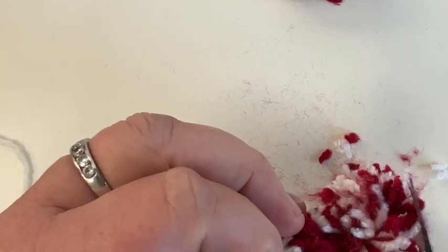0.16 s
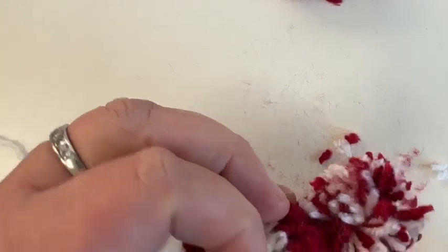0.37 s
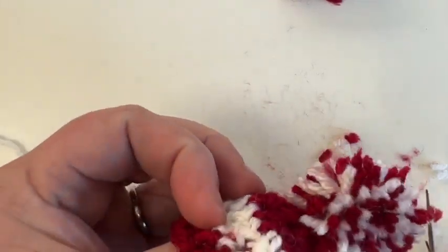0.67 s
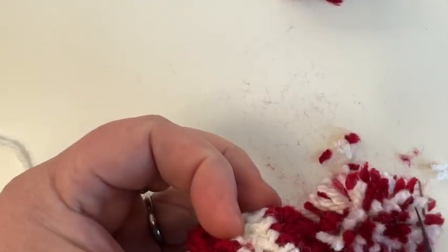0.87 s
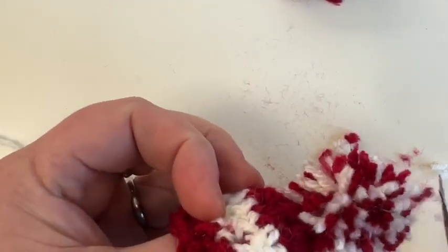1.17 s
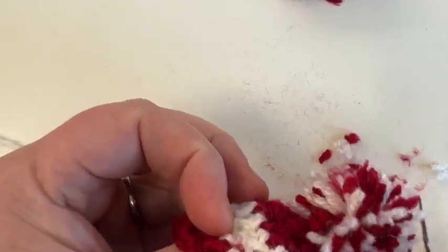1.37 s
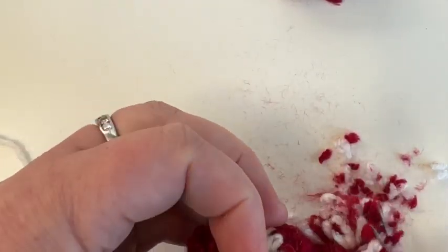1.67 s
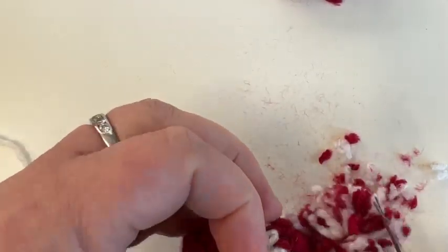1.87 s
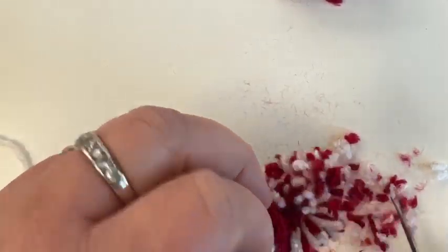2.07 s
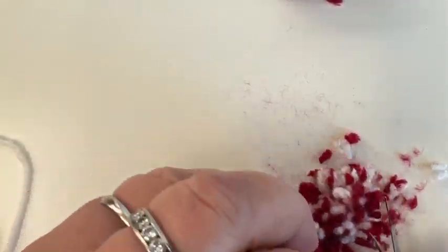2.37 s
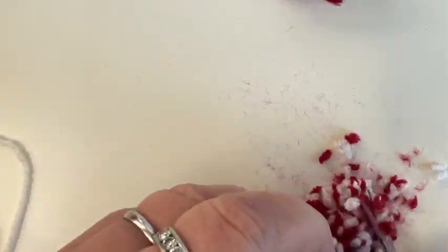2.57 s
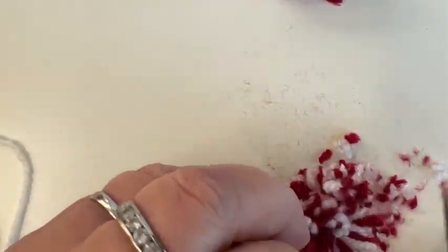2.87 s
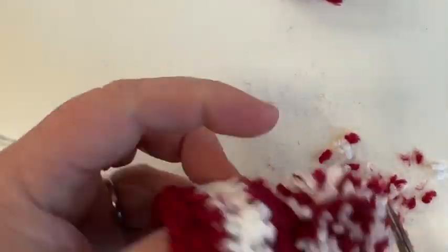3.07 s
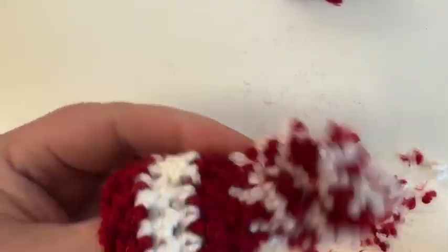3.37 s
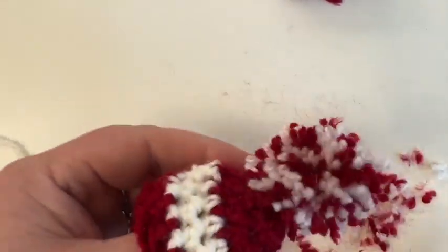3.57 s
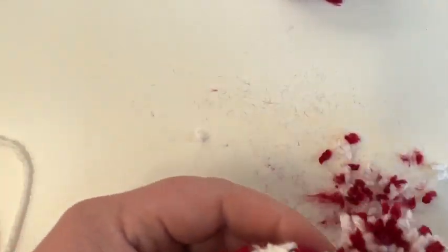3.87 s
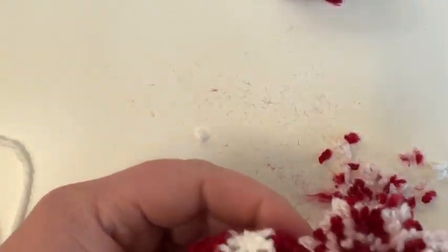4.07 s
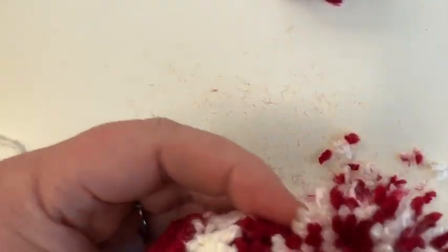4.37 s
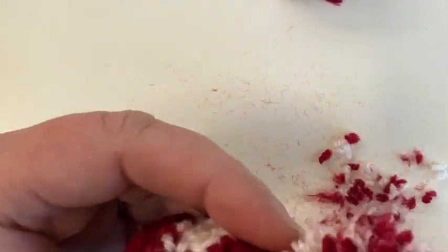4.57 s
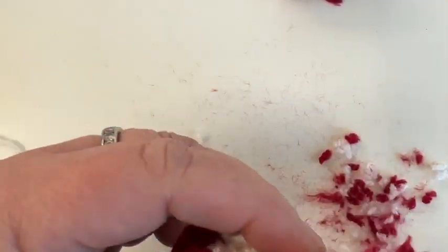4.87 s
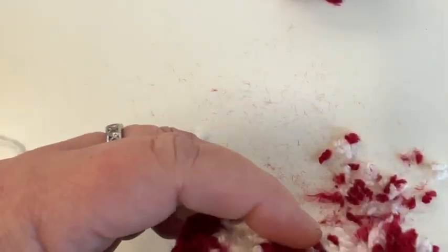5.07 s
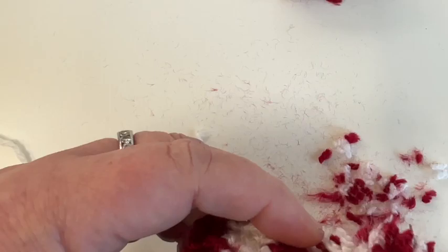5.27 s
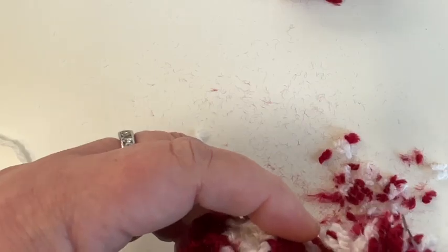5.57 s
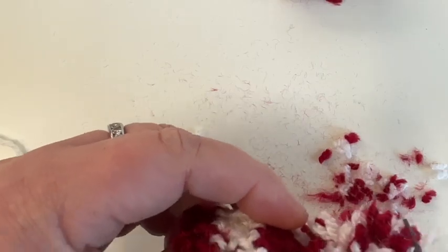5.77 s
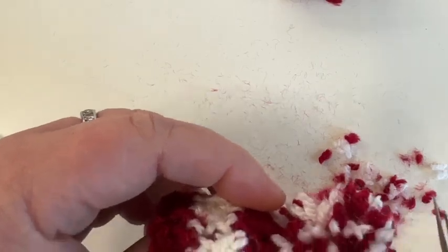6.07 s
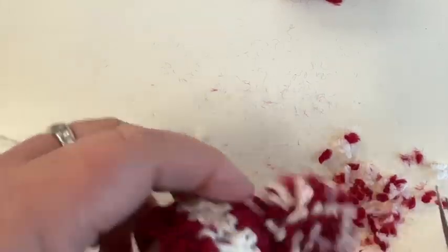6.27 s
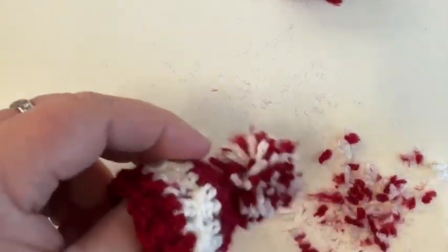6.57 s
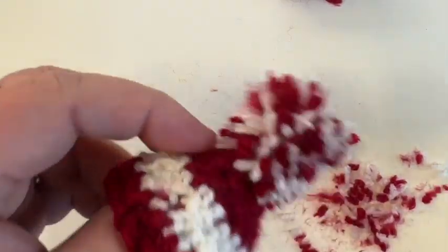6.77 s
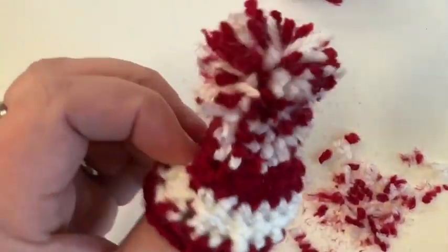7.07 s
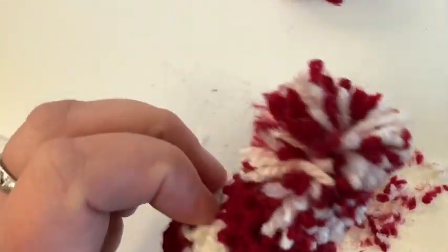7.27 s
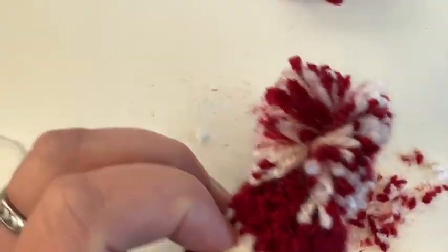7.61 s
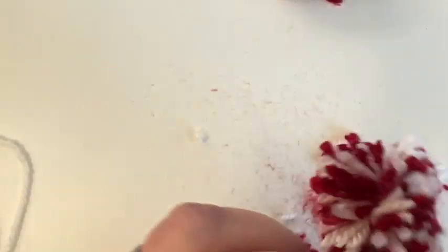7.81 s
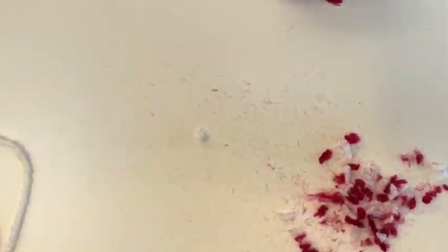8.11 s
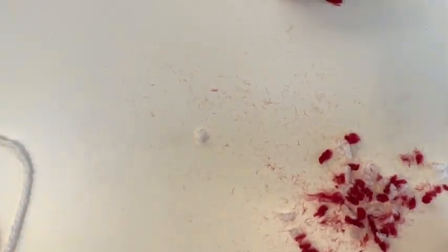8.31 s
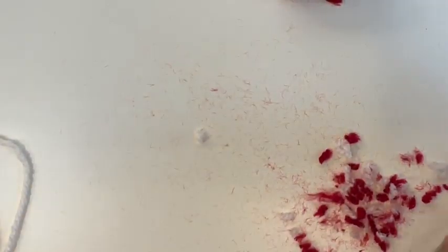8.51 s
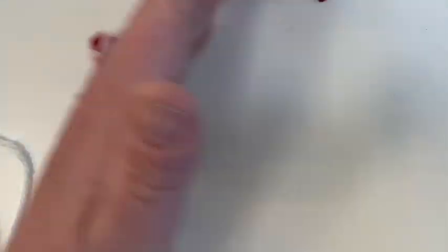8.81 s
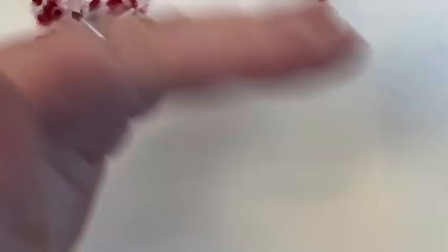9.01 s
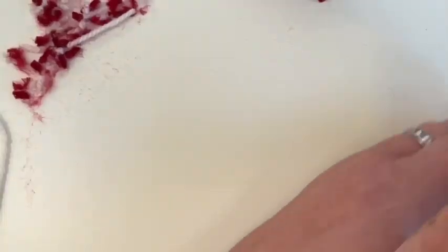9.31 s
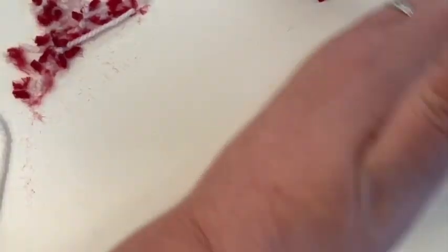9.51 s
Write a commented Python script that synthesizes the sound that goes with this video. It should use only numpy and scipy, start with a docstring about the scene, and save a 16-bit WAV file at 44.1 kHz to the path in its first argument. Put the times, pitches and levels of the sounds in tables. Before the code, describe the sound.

A quiet small room with low rumble and faint hum, heard close at a tabletop. From 0 to 2.6 s scissors make four short rasping cuts through yarn, at about 0.1, 0.9, 1.7 and 2.5 s, swelling into crunches, with a bright click at 0.25 and faint blade slides between. At 2.8 s they knock down on the table with a brief scrape. Soft wool rustle follows, barely audible. At 5.5 s a longer cut swells and snaps shut at 5.75; a sharp steel click comes at 6.6 amid rising rustle until 7. At 7.15 the scissors hit the table hard, then clatter in a rapid burst at 7.45 and small dying bounces to 7.8. A palm lands softly at 8.15, slides, and pushes a grainy hiss from 8.5 to 8.9. A second dull landing at 9.2 leads to a shorter sweep ending near 9.7.

```python
"""Scissors rasp through a yarn pompom and click shut; twice they clatter down on the tabletop.
The wool rustles as it is turned, then a palm lands and sweeps the clippings away in two strokes.
Rasp, rustle and sweep are grainy friction noise, shaped by the blades, the wool or the table.
Clicks are short noise bursts; blows ring the modes of the tabletop. A quiet room hums and echoes."""
import sys
import numpy as np
from scipy import signal
from scipy.fft import rfft, irfft, next_fast_len
from scipy.io import wavfile
from scipy.ndimage import map_coordinates

SR = 44100
rng = np.random.default_rng(int(sys.argv[2]) if len(sys.argv) > 2 else 0)


def wav_out(sig):
    """Save sig, one row per channel (or a flat mono array), as 16-bit PCM at SR to the path in sys.argv[1]."""
    wavfile.write(sys.argv[1], SR, np.round(np.clip(np.atleast_2d(sig).T, -1, 1) * 32767).astype(np.int16))


N = 425562

# colour of rubbed wool, also of the blades' scrape: (frequency [Hz], gain [dB])
WOOL_COLOUR = [(300, 8), (900, 1.5), (1900, -7.5), (2800, 0), (4000, -5), (6000, -6), (9000, -7.5),
               (12000, -7), (16000, -25)]
# left-right correlation of nearby noise: (frequency [Hz], likeness [-1..1])
NEAR_SAME = [(300, 1), (600, .75), (1100, .65), (1800, .99), (4000, .97), (5000, .72), (6000, .99),
             (7300, .98), (9500, .76), (11500, .76), (12400, .98), (12900, .999)]
# left-right correlation of the tabletop and the room tail: (frequency [Hz], likeness [-1..1])
PLATE_SAME = [(60, 1), (150, .99), (350, .9), (600, .6), (1100, .55), (1700, .99), (4000, .88), (6500, .96),
              (9500, .75), (12500, .95)]
BLADE_ATTACK_S, BLADE_RELEASE_S = 0.0076, 0.0048


def amp(db):
    """Decibels to gain."""
    return 10 ** (np.asarray(db) / 20)


def unit(x):
    """Scales to rms 1."""
    return x / np.sqrt(np.mean(x ** 2) + 1e-20)


def read(points, hz):
    """Reads a table of (Hz, value) on a log-frequency axis."""
    f, value = np.transpose(points)
    return np.interp(np.log(hz + 1), np.log(f + 1), value)


def seconds(size):
    """Time axis of size samples."""
    return np.arange(size) / SR


def noise_pair(size):
    """Two unrelated channels of white noise."""
    return rng.standard_normal((2, size))


def add(mix, start_s, sound):
    """Mixes a two-channel sound in at start_s."""
    part = mix[:, max(round(start_s * SR), 0):][:, :sound.shape[-1]]
    part += sound[..., :part.shape[1]]


def gate(t, length_s, attack_s, release_s):
    """Exponential attack, hold and release over the time t since the start."""
    rise = 1 - np.exp(-np.maximum(t, 0) / attack_s)
    return rise * np.exp(-np.maximum(t - length_s, 0) / release_s)


def shape(x, gain):
    """Causal minimum-phase filter whose magnitude is gain(hz)."""
    size = 2 * next_fast_len(x.shape[-1] // 2 + 2048)
    log_gain = np.log(np.maximum(gain(abs(np.fft.fftfreq(size, 1 / SR))), 1e-5))
    response = np.exp(signal.hilbert(log_gain).conj())[:size // 2 + 1]
    return irfft(rfft(x, size) * response, size)[..., :x.shape[-1]]


def resonate(x, centre_hz, width_hz):
    """A resonance of gain 1 whose centre follows the curve centre_hz."""
    turn = np.exp(2j * np.pi * np.cumsum(centre_hz) / SR)
    r = np.exp(-np.pi * width_hz / SR)
    return 2 * (turn * signal.lfilter([1 - r], [1, -r], x / turn)).real


def pair(x, likeness):
    """Blends two unrelated signals into left and right of the given likeness."""
    size = next_fast_len(x.shape[-1])
    same = np.clip(read(likeness, np.fft.rfftfreq(size, 1 / SR)), -1, 1)
    mid, side = rfft(x, size) * np.sqrt([(1 + same) / 2, (1 - same) / 2])
    return irfft(np.array([mid + side, mid - side]), size)[:, :x.shape[-1]]


def dying(decay, size):
    """Two channels of noise in which each band dies at its own speed."""
    hz, t, z = signal.stft(noise_pair(size), SR, nperseg=128)
    z = z * amp(-60 * t / read(decay, hz)[:, None])
    return pair(signal.istft(z, SR)[1][:, :size], PLATE_SAME)


def friction(size, slips_per_s, spread_db, smooth, patchy_db, patch_hz):
    """Surfaces catch and slip: tiny clicks of uneven size over a smooth hiss, coming in clumps."""
    slip_sizes = amp(spread_db * np.minimum(rng.exponential(1, size), 4))
    slips = (rng.random(size) < slips_per_s / SR) * slip_sizes
    grains = unit(slips * noise_pair(size)) + smooth * noise_pair(size)
    clumps = np.interp(np.arange(size) * patch_hz / SR, np.arange(size), rng.standard_normal(size))
    return pair(grains, NEAR_SAME) * amp(patchy_db * clumps)


def mottle(x, depth_db, width_hz, span_s):
    """The colour shifts as the contact moves: random peaks and dips, width_hz wide and span_s long."""
    hz, t, z = signal.stft(x, SR, nperseg=256)
    grid = np.meshgrid(hz / width_hz, t / span_s, indexing="ij")
    field = map_coordinates(rng.standard_normal((96, 96)), grid, order=1, mode="wrap")
    return signal.istft(z * amp(depth_db * field), SR)[1][:, :x.shape[-1]]


def mirrored(hz, spacing_hz):
    """The tabletop mirrors a sound just above it: a comb with a tooth every spacing_hz."""
    reflection = .5 / (1 + (hz / 12000) ** 2)
    return abs(1 + reflection * np.exp(-2j * np.pi * hz / spacing_hz))


def room_tone(hum_width_hz=4):
    """Low rumble of the room with a wavering hum, made of very narrow noise bands."""
    # rumble spectrum: (frequency [Hz], gain [dB])
    air_colour = [(25, -28.5), (48, -8), (75, -9.5), (150, -15), (205, -10.5), (300, -21), (370, -20),
                  (550, -27.5), (800, -30), (1100, -39.5), (2500, -46.5), (4500, -52.5), (7000, -51.5),
                  (11000, -57.5), (16000, -59)]
    # left-right correlation of the rumble: (frequency [Hz], likeness [-1..1])
    air_same = [(100, 1), (300, 0.82), (550, 0), (1100, 0), (2000, 0.97), (4000, 0.95), (6500, 1),
                (10000, 0.75)]
    # hum bands: (frequency [Hz], rms level [dB])
    hum_bands = [(49, -63.5), (198, -73)]
    out = amp(-62) * unit(shape(pair(noise_pair(N), air_same), lambda hz: amp(read(air_colour, hz))))
    for f, db in hum_bands:
        band = shape(rng.standard_normal(N), lambda hz: 1 / (1 + ((hz - f) / hum_width_hz) ** 2))
        out = out + amp(db) * unit(band)
    return out


def slide(t, glide, scrape_db):
    """Undamped by yarn, the blades ring in narrow bands that glide, over a scrape."""
    # bands of the free blades: (frequency [Hz], width per pass [Hz], level [dB])
    slide_ring = [(1340, 150, 6), (2850, 640, -0.5), (4090, 980, -2), (7400, 740, -20)]
    drive = friction(len(t), slips_per_s=2600, spread_db=3, smooth=.8, patchy_db=1.2, patch_hz=70)
    bend = 2 ** (glide * np.minimum(t, .1))
    ring = 0
    for f, width_hz, db in slide_ring:
        ring = ring + amp(db) * resonate(resonate(drive, f * bend, width_hz), f * bend, width_hz)
    scrape = shape(drive, lambda hz: amp(read(WOOL_COLOUR, hz)))
    return unit(unit(ring) + amp(scrape_db) * unit(scrape))


def slides(fade_db=0.5):
    """Empty blades slide on each other with a hollow ring, fading by fade_db over each length."""
    # (start [s], length [s], level [dB], glide [octaves/s], scrape against the ring [dB])
    slide_rows = [(0.0, 0.079, -69, -0.15, 0), (0.347, 0.062, -71, -2, -8), (1.13, 0.038, -66.5, -1.4, -9),
                  (2.009, 0.055, -66.5, -1, -3)]
    out, t = np.zeros((2, N)), seconds(SR // 3)
    for start_s, length_s, db, glide, scrape_db in slide_rows:
        force = amp(db - fade_db * t / length_s) * gate(t, length_s, BLADE_ATTACK_S, BLADE_RELEASE_S)
        add(out, start_s, slide(t, glide, scrape_db) * force)
    return out


def steel(hz, own_peak, valley_db=-19):
    """Gain of the blades' broad resonances, plus one own_peak of the moment."""
    # blade resonances: (frequency [Hz], width [Hz], level [dB])
    blade_peaks = [(1250, 330, -4), (2620, 850, 2), (4340, 2000, -2), (6220, 1100, 1), (8260, 2300, -1.5),
                   (11000, 4000, -4.5), (14700, 1500, -8)]
    power = amp(valley_db) ** 2
    for f, width_hz, db in [*blade_peaks, own_peak]:
        power = power + amp(db) ** 2 / (1 + (2 * (hz - f) / width_hz) ** 2) ** 2
    return np.sqrt(power) * hz ** 2 / (hz ** 2 + 900 ** 2)


def rasp(size, tilt_db, ring_hz, ring_db, ring_width_hz=900, comb_hz=1420):
    """Shearing strands rings the blades, whose colour shifts as the crossing point travels."""
    drive = friction(size, slips_per_s=5000, spread_db=2, smooth=.5, patchy_db=1.6, patch_hz=170)
    spacing_hz = comb_hz * rng.uniform(.975, 1.025)  # the height of the blades varies

    def gain(hz):
        tilt = amp(tilt_db * np.log2(np.maximum(hz, 1000) / 5000))
        return steel(hz, (ring_hz, ring_width_hz, ring_db)) * mirrored(hz, spacing_hz) * tilt

    return unit(mottle(shape(drive, gain), depth_db=3.8, width_hz=330, span_s=.03))


def snips(open_ring_hz=4280, swell_curve=1.49):
    """The rasp swells as blades close on strands; the low open ring passes to the grip resonance."""
    # cuts: (start [s], end [s], final level [dB], swell [dB], brightness [dB/octave],
    #        ring of the open blades [dB], grip resonance [Hz], its level [dB])
    snip_rows = [(0.078, 0.217, -56, 10.5, -1.5, 3, 9000, -6), (0.884, 1.01, -49, 20, 0, 6.5, 7900, 8),
                 (1.711, 1.876, -50.5, 23.5, 0.5, -1, 7650, 5), (2.516, 2.59, -55, 1.5, 1, 7, 7590, 1),
                 (5.498, 5.721, -50, 25, -.5, -4, 7180, 8)]
    # thick bundles give way with a crunch: (time [s], half length [s], extra level [dB])
    bundles = [(0.138, .017, 8), (0.209, 0.012, 5), (1.007, .008, 9.5), (1.838, .02, 4),
               (5.625, 0.0053, 3.5), (5.662, 0.0068, 5.5), (5.713, .012, 9.5)]
    out, t = np.zeros((2, N)), seconds(SR // 3)
    for start_s, end_s, db, swell_db, tilt_db, open_db, grip_hz, grip_db in snip_rows:
        length_s = end_s - start_s
        still_open = np.clip(1 - t / length_s, 0, 1)
        shut = 1 - still_open
        crunch_db = sum(extra_db * np.exp(-((start_s + t - s) / half_s) ** 2)
                        for s, half_s, extra_db in bundles)
        force = amp(db - swell_db * still_open ** swell_curve + crunch_db)
        open_rasp = rasp(len(t), tilt_db, open_ring_hz, open_db)
        shut_rasp = rasp(len(t), tilt_db, grip_hz, grip_db)
        cut = np.sqrt(1 - shut ** 2) * open_rasp + shut * shut_rasp
        add(out, start_s, cut * force * gate(t, length_s, BLADE_ATTACK_S, BLADE_RELEASE_S))
    return out


def clicks(ring_s=0.00084, rebound_s=0.0013, rebound_db=-2):
    """Blades meet their stop or tick at the pivot: held steel rings for a millisecond, rebounds once."""
    # (time [s], level [dB], 20 dB above the rms of the burst)
    click_rows = [(0.2533, -21.5), (0.349, -55), (1.041, -40), (1.131, -54), (1.93, -43.5), (5.7473, -19),
                  (5.902, -57), (6.234, -46), (6.2985, -47.5), (6.6002, -15.5), (7.462, -25),
                  (7.9076, -40.5), (7.947, -38.5)]
    # (frequency [Hz], gain [dB])
    click_colour = [(1000, -45), (2100, -19), (2900, -2.5), (4200, -20), (5600, -3), (7400, 0.5),
                    (8800, -4.5), (10200, -20), (11800, -6.5), (14500, -12.5), (16000, -3)]
    out, t = np.zeros((2, N)), seconds(1024)
    rebound = amp(rebound_db) * (t > rebound_s) * np.exp(-abs(t - rebound_s) / ring_s)
    contact = np.exp(-t / ring_s) + rebound
    for s, db in click_rows:
        burst = pair(noise_pair(len(t)), NEAR_SAME) * contact
        tick = shape(burst, lambda hz: amp(read(click_colour, hz)))
        add(out, s, amp(db - 20) * unit(tick))
    return out


def table_modes(t, scatter=0.53):
    """Ring of the tabletop; each blow weights the modes differently, each port hears its own phase."""
    # modes before any damping by a hand: (frequency [Hz], level [dB], t60 [s])
    mode_rows = [(47.1, -19.5, 0.7), (114, -8.5, 0.2), (140.6, -10, 0.08), (187, -6.5, 0.07),
                 (223.7, 0, 0.12), (279.5, -6.5, 0.11), (356, -7, 0.09), (430, -12.5, 0.33),
                 (498, -3, 0.11), (644.5, -2.5, 0.089), (763, -6, 0.079), (867, -8.5, 0.063),
                 (983, -12.5, 0.061), (1068, -7.5, 0.15), (1172, -8.5, 0.083), (1563, -13.5, 0.075),
                 (1726, -16, 0.069), (1814, -11.5, 0.067), (2060, -16, 0.07), (2262, -9, 0.08)]
    hz, db, t60_s = np.transpose(mode_rows)[:, :, None]
    sign = (-1) ** np.arange(len(hz))[:, None]
    place = sign * (1 + scatter * rng.standard_normal(hz.shape))
    apart = sign * np.arccos(read(PLATE_SAME, hz)) / 2
    ring = place * amp(db - 60 * t / t60_s)
    return np.array([(ring * np.sin(2 * np.pi * hz * t + port * apart)).sum(0) for port in (-1, 1)])


def notch(hz, node_hz, width, depth_db=-15):
    """Modes with a node at the struck place stay nearly silent; width is a share of node_hz."""
    return amp(depth_db * np.exp(-((hz / node_hz - 1) / width) ** 2))


def blows(bounce_count=4, rebound_share=0.82, bounce_loss_db=5):
    """Single blows, and a run of bounces that come ever sooner and weaker."""
    # light contacts lack bass, soft ones treble; a hand that stays damps the ring:
    # (time [s], level [dB], low edge [Hz], high edge [Hz], node [Hz], damping time constant [s])
    knock_rows = [(0.8086, -32.5, 350, 510, 2000, .008), (2.8087, -18.5, 251, 3550, 452, 0.036),
                  (2.8105, -11, 120, 520, 447, .035), (7.012, -28.5, 99.5, 247, 590, .1),
                  (7.144, -5, 1240, 1340, 663, 0.027), (7.146, -17.5, 70, 480, 224, 0.036),
                  (7.272, -16.5, 50, 230, 213, 0.056), (7.434, -10, 228, 1520, 1410, .3),
                  (7.4535, -11.5, 395, 3540, 1340, .3), (7.4614, -11.5, 150, 1760, 1300, 0.23),
                  (7.4685, -13, 290, 655, 1300, .3), (7.4764, -13.5, 280, 1200, 1290, .3),
                  (7.4824, -12, 263, 750, 1290, .3), (7.5006, -16, 295, 2560, 1270, 0.34),
                  (7.907, -40, 600, 2770, 3780, .01)]
    # (first bounce [s], level [dB], low edge [Hz], high edge [Hz], node [Hz], first gap [s])
    bounce_rows = [(7.5927, -25, 450, 1700, 1570, .068)]
    rows = list(knock_rows)
    for s, db, low_hz, high_hz, node_hz, gap_s in bounce_rows:
        for k in range(bounce_count):
            rows.append((s, db - k * bounce_loss_db, low_hz, high_hz, node_hz, np.inf))
            s = s + gap_s * rebound_share ** k
    return rows


def knocks(crack_db=17, dense_db=-2.5, ring_db=-13, spread_s=0.003065, node_width=0.13):
    """A crack, dense plate modes and a few long ones; bass arrives last, as bending waves do."""
    # crack and dense modes: (frequency [Hz], gain [dB])
    top_colour = [(60, -9.5), (130, 13), (450, -0.5), (570, -5.5), (680, -4), (1400, 4.5), (2100, 3.5),
                  (2600, -4.5), (3500, -6.5), (7000, -2), (11000, -6), (16000, -8)]
    # dense modes before any damping by a hand: (frequency [Hz], t60 [s])
    top_decay = [(100, 0.02), (500, 0.38), (1500, 0.024), (4000, 0.088), (12000, 0.077)]
    out, t = np.zeros((2, N)), seconds(16384)
    f = np.fft.rfftfreq(len(t), 1 / SR)
    bending = np.exp(-4j * np.pi * spread_s * np.sqrt(300 * f))  # delay falls as 1 / sqrt(Hz)
    for s, db, low_hz, high_hz, node_hz, damping_s in blows():
        def contact(hz):
            edges = hz / np.hypot(hz, low_hz) / (1 + (hz / high_hz) ** 2) ** 0.95
            return edges * notch(hz, node_hz, node_width)

        plate = amp(dense_db) * dying(top_decay, len(t)) / 2 + amp(crack_db) * (t == 0)
        blow = shape(plate, lambda hz: amp(read(top_colour, hz))) + amp(ring_db) * table_modes(t)
        blow = shape(blow * np.exp(-t / damping_s), contact)
        add(out, s, amp(db) * irfft(rfft(blow) * bending))
    return out


def wool(hiss_width_hz=1200, comb_hz=1450, rise_share=0.03, release_s=0.053, level_rise_db_per_s=1):
    """Wool and skin rub as the piece is turned just above the table: rustle and gliding hiss."""
    # (start [s], length [s], level [dB], hiss centre [Hz], glide [octaves/s], hiss against rustle [dB])
    rub_rows = [(2.043, 0.039, -72.5, 2280, -5, 19), (2.995, 0.044, -69.5, 3700, 2, -7.5),
                (3.172, 0.079, -74.5, 2850, -1, -6.5), (3.325, 0.031, -71, 2700, -8, -12),
                (3.682, 0.029, -71, 1990, -9, 5), (4.237, .45, -75.5, 4730, -0.6, -7.5),
                (6.157, 0.15, -76, 3620, 3, -11), (6.439, 0.061, -72, 2400, -4, -9),
                (6.53, 0.058, -67.5, 3600, 1, -9), (6.581, 0.15, -64.5, 7400, 2, -8),
                (6.749, 0.085, -67, 3400, 1, -1), (6.839, 0.15, -62.5, 4400, 1, 0),
                (6.907, 0.25, -60, 9500, -2, -25), (6.921, 0.25, -66.5, 5450, -1.3, 3),
                (7.256, 0.72, -68, 2380, 0, -14), (7.769, 0.33, -65, 2830, -1, -28),
                (8.878, 0.35, -63.5, 3300, 1.4, -7.5)]
    out, t = np.zeros((2, N)), seconds(3 * SR // 4)
    for start_s, length_s, db, centre_hz, glide, hiss_db in rub_rows:
        drive = friction(len(t), slips_per_s=2000, spread_db=3.3, smooth=1.5, patchy_db=1.2, patch_hz=35)
        fibres = shape(drive, lambda hz: amp(read(WOOL_COLOUR, hz)) * mirrored(hz, comb_hz) ** .7)
        fibres = unit(mottle(fibres, depth_db=2.5, width_hz=400, span_s=.09))
        centre = centre_hz * 2 ** (glide * np.minimum(t, length_s))
        hiss = resonate(pair(noise_pair(len(t)), NEAR_SAME), centre, hiss_width_hz)
        hiss = unit(resonate(hiss, centre, hiss_width_hz))
        force = amp(db + level_rise_db_per_s * t)
        force = force * gate(t, length_s, rise_share * length_s, release_s)  # longer rubs set in slower
        add(out, start_s, force * unit(fibres + amp(hiss_db) * hiss))
    return out


def thumps(damping_s=0.19):
    """Soft, slow contacts push the table, so mostly low modes answer; the palm stays to damp them."""
    # palm and fingers drop, and at 2.8 s the heavy landing of the scissors: (time [s], level [dB], contact time
    # [s])
    thump_rows = [(2.11, -47, 0.0038), (2.813, -27.5, 0.0051), (8.134, -32.5, 0.0046), (8.163, -37, 0.006),
                  (9.187, -30, 0.02), (9.228, -32, 0.019), (9.285, -36, 0.015)]
    out, t = np.zeros((2, N)), seconds(SR // 2)
    for s, db, contact_s in thump_rows:
        u = t / (contact_s / 2)
        push = u * (6 - 6 * u + u ** 2) * np.exp(-u) / 2
        pulse = u ** 2 * np.exp(-2 * u)
        ring = signal.fftconvolve(table_modes(t) * np.exp(-t / damping_s), [pulse])[:, :len(t)]
        add(out, s, amp(db) * (push + ring / abs(ring).max()))
    return out


def handles():
    """The handles clack on the table with a short ring of their own: decaying sines."""
    # modes: (frequency [Hz], level [dB], t60 [s])
    handle_modes = [(1348, 1, .04), (1440, -2.5, .028), (2240, -1, .04), (3550, -9, .045),
                    (5570, -11, 0.029)]
    # (time [s], level [dB])
    handle_hits = [(2.809, -38), (7.1445, -28.5), (7.435, -32)]
    out, t = np.zeros((2, N)), seconds(SR // 8)
    ring = 0
    for k, (hz, db, t60_s) in enumerate(handle_modes):
        ring = ring + (-1) ** k * amp(db - 60 * t / t60_s) * np.sin(2 * np.pi * hz * t)
    for s, db in handle_hits:
        add(out, s, amp(db) * ring)
    return out


def skids(steel_hz=2700, attack_s=0.0044, release_s=.005):
    """Handles and blades chatter across the tabletop and set one of its modes humming."""
    # (start [s], length [s], level [dB], treble of bare steel [dB], hum [Hz], hum width [Hz], hum [dB])
    skid_rows = [(2.81, 0.04, -35.5, -2, 294, 16, -5.5), (7.159, 0.039, -47, -20, 444, 80, -2.5),
                 (7.236, 0.041, -45, -19.5, 427, 36, 0)]
    # (frequency [Hz], gain [dB])
    skid_colour = [(100, 2.5), (850, -4), (1300, 1.5), (2200, -1), (3300, 3), (5000, -4.5), (7200, -5),
                   (12000, -20)]
    out, t = np.zeros((2, N)), seconds(SR // 3)
    for start_s, length_s, db, steel_db, hum_hz, hum_width_hz, hum_db in skid_rows:
        def gain(hz):
            return amp(read(skid_colour, hz) + steel_db / (1 + (steel_hz / (hz + 1)) ** 8))

        force = gate(t, length_s, attack_s, release_s)
        drive = friction(len(t), slips_per_s=2500, spread_db=2, smooth=.8, patchy_db=1.1, patch_hz=250)
        scrape = force * unit(mottle(shape(drive, gain), depth_db=3, width_hz=260, span_s=.04))
        hum = unit(resonate(force * drive, np.full(len(t), hum_hz), hum_width_hz)) * scrape.std()
        add(out, start_s, amp(db) * (scrape + amp(hum_db) * hum))
    return out


def brush(size, low_hz, comb_hz=1330):
    """Grainy hiss of skin and clippings on the smooth top."""
    # (frequency [Hz], gain [dB])
    sweep_colour = [(200, 1), (800, -4), (1400, -3), (2600, -0.5), (3000, -2.5), (3600, 1), (4200, 1.5),
                    (5000, 2), (6200, 2.5), (8400, 5), (10500, 4), (12500, 3), (15500, -1.5)]

    def gain(hz):
        low_cut = hz ** 2 / np.hypot(hz ** 2, low_hz ** 2)
        return amp(read(sweep_colour, hz)) * mirrored(hz, comb_hz) ** 0.14 * low_cut

    drive = friction(size, slips_per_s=3000, spread_db=2.4, smooth=1.4, patchy_db=.9, patch_hz=60)
    return unit(mottle(shape(drive, gain), depth_db=2.7, width_hz=380, span_s=.06))


def sweep(gain_db=5.5, slide_low_hz=200, hollow_width_hz=1100, push_arc=0.9, push_shape=0.62,
          release_s=0.011):
    """The hiss follows the speed of the palm; in the push the hollow under the hand rings."""
    # palm lands, slides lightly, pushes, lifts: (lands [s], settling time [s], push starts [s],
    #  lifts [s], sliding level before gain_db [dB], push [dB], low edge of the push [Hz],
    #  hollow under the hand [Hz], its level [dB])
    sweep_rows = [(8.142, 0.033, 8.472, 8.895, -59.5, 12.5, 1450, 6800, -14),
                  (9.166, 0.01, 9.42, 9.67, -56, 6.5, 1320, 3800, -12)]
    out, t = np.zeros((2, N)), seconds(SR)
    for lands_s, settle_s, push_s, lifts_s, slide_db, push_db, low_hz, hollow_hz, hollow_db in sweep_rows:
        progress = np.clip((lands_s + t - push_s) / (lifts_s - push_s), 0, 1)
        speed = np.sin(np.pi * push_arc * progress) ** push_shape
        centre = np.full(len(t), hollow_hz)
        hollow = resonate(brush(len(t), low_hz), centre, hollow_width_hz)
        hollow = unit(resonate(hollow, centre, hollow_width_hz))
        push = unit(brush(len(t), low_hz) + amp(hollow_db) * hollow)
        hiss = np.sqrt(1 - speed) * brush(len(t), slide_low_hz) + np.sqrt(speed) * push
        level = amp(gain_db + slide_db + push_db * speed)
        add(out, lands_s, hiss * level * gate(t, lifts_s - lands_s, settle_s, release_s))
    return out


def room(x, first_s=0.0024):
    """The walls return a soft noise tail that sets in after first_s."""
    # (frequency [Hz], t60 [s])
    room_decay = [(100, 0.27), (600, 0.57), (2500, 0.39), (8000, 0.27), (15000, 0.35)]
    size = SR // 2
    tail = dying(room_decay, size) * np.clip(seconds(size) / first_s - 1, 0, 1)
    return signal.fftconvolve(x, tail / np.linalg.norm(tail[0]), axes=1)[:, :N]


def scene():
    """Scissors, table and hands, with the room behind them."""
    scissors = slides() + snips() + clicks()
    table = knocks() + thumps() + handles()
    scrapes = skids()
    hands = wool() + sweep()
    walls = room(amp(-18) * scissors + amp(-11) * table + amp(-10.5) * scrapes + amp(-14) * hands)
    return scissors + table + scrapes + hands + walls + room_tone()


def record(dry, low_cut_hz=36, edge_hz=15900):
    """The two ports turn the treble's phase apart; then the low cut and the band limit."""
    # (frequency [Hz], phase by which left leads [rad])
    port_phase = [(4300, 0), (4800, -1.3), (5050, -3.1), (5300, -5.1), (5700, -6.28), (7900, -6.3),
                  (8500, -7.1), (10000, -7.8), (11500, -8.5), (12500, -9.42)]
    hz = np.fft.rfftfreq(N, 1 / SR)
    ports = np.exp(1j * read(port_phase, hz) * np.array([[.5], [-.5]]))
    low_cut = signal.butter(7, low_cut_hz, "highpass", fs=SR, output="sos")
    heard = signal.sosfilt(low_cut, irfft(rfft(dry) * ports, N))
    band_limit = signal.firwin(255, edge_hz, window=("kaiser", 9), fs=SR)
    return signal.oaconvolve(heard, band_limit[None], "same")


dry = scene()
out = record(dry)
wav_out(out)
```